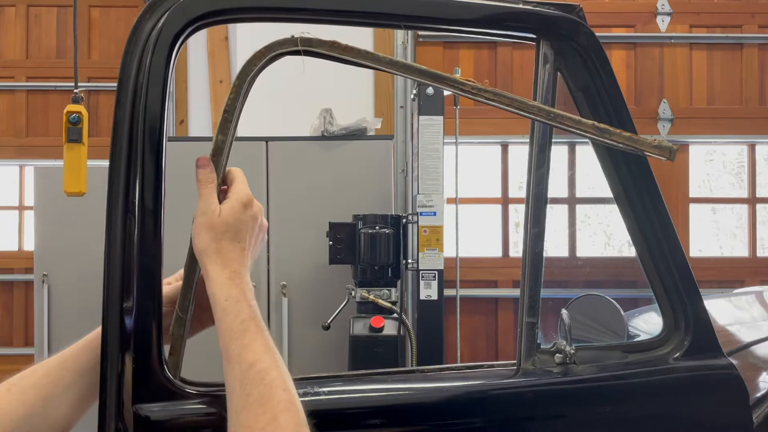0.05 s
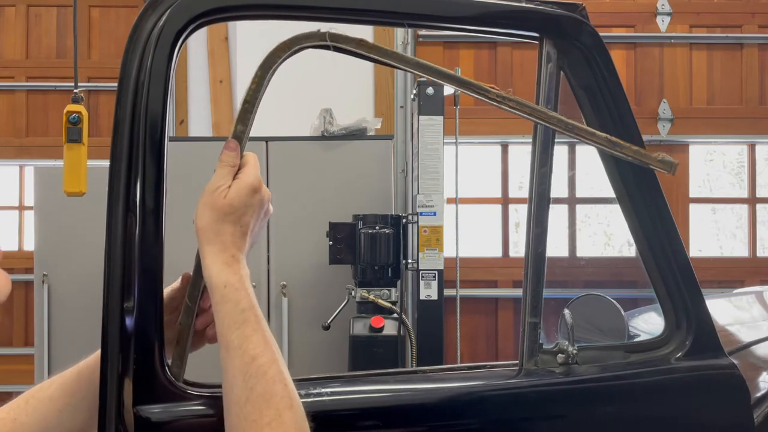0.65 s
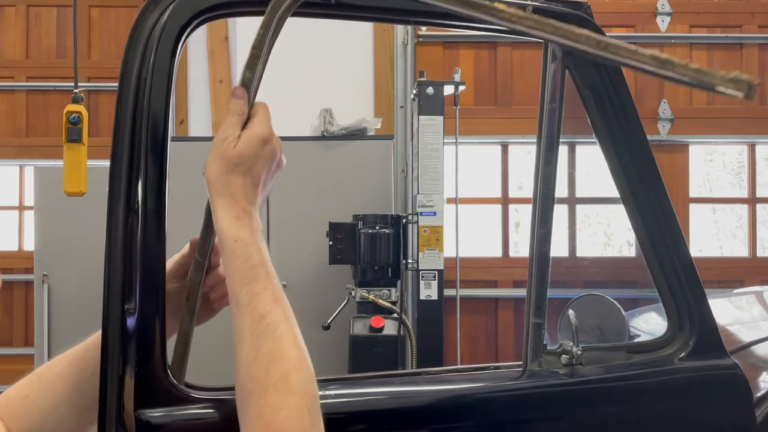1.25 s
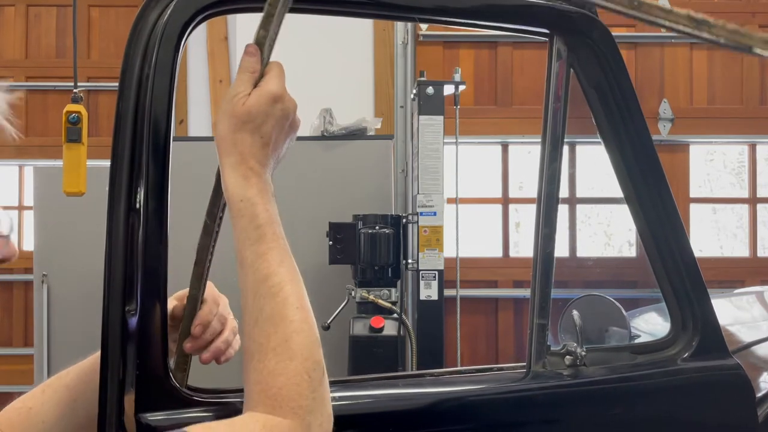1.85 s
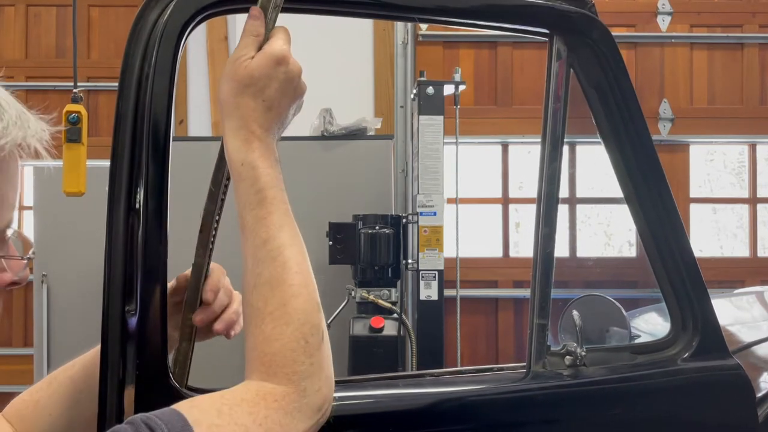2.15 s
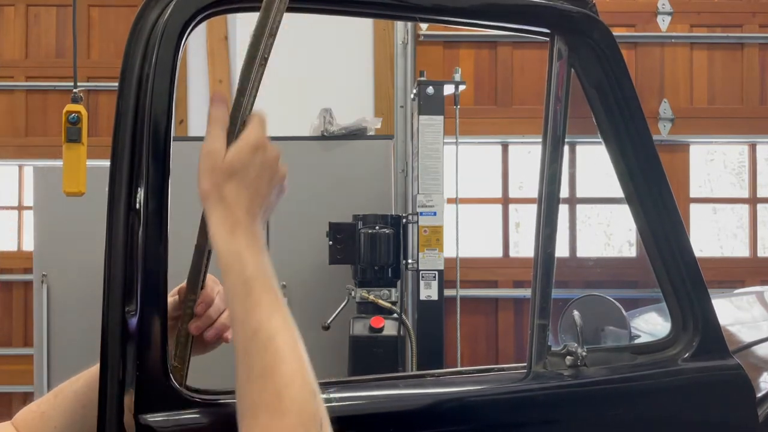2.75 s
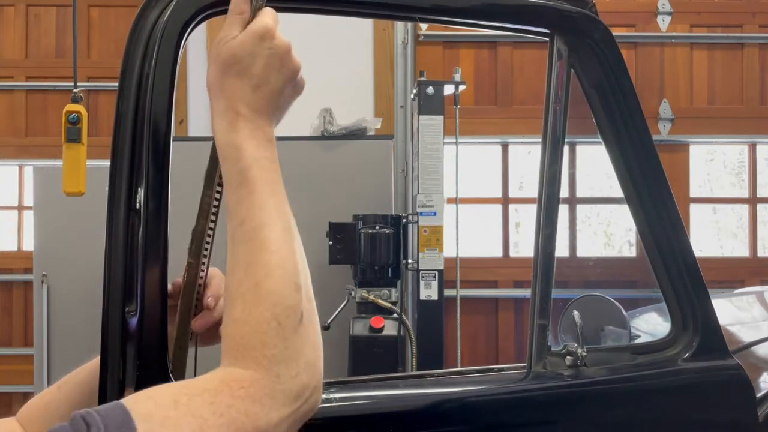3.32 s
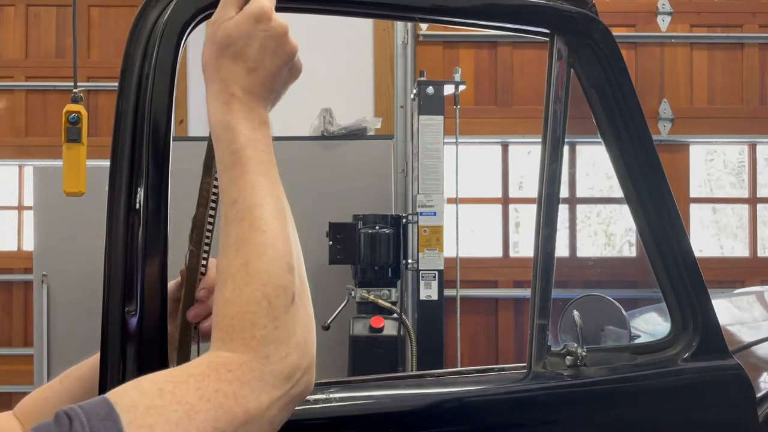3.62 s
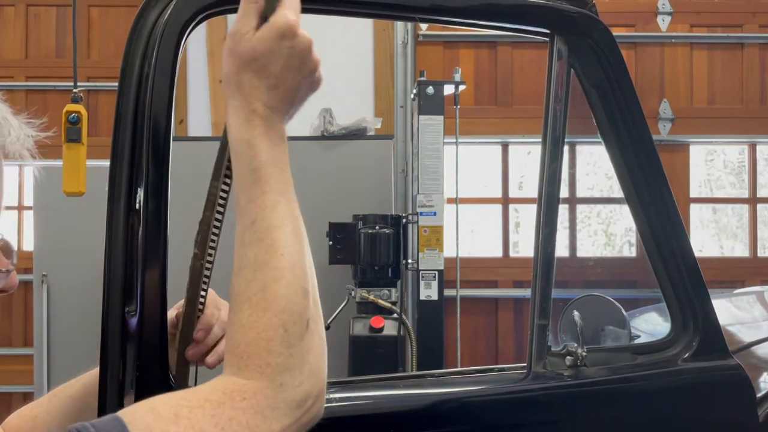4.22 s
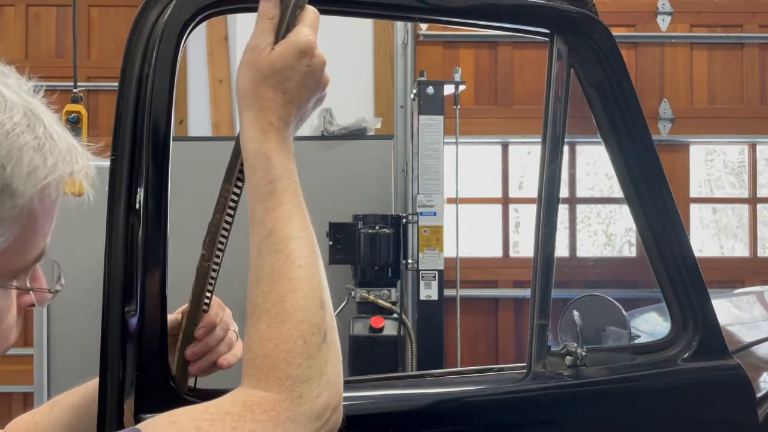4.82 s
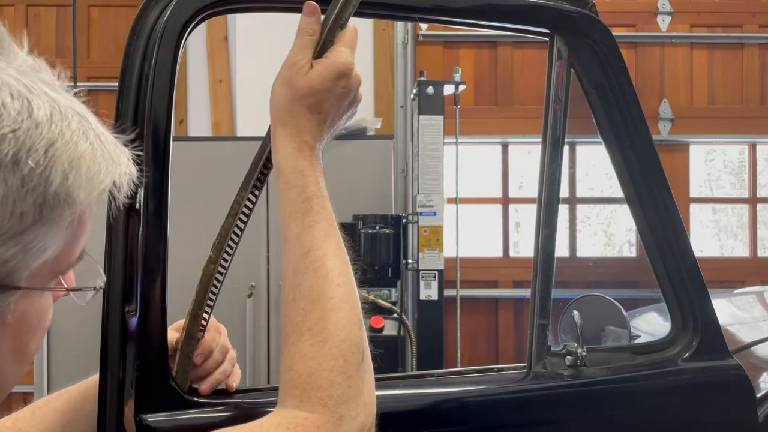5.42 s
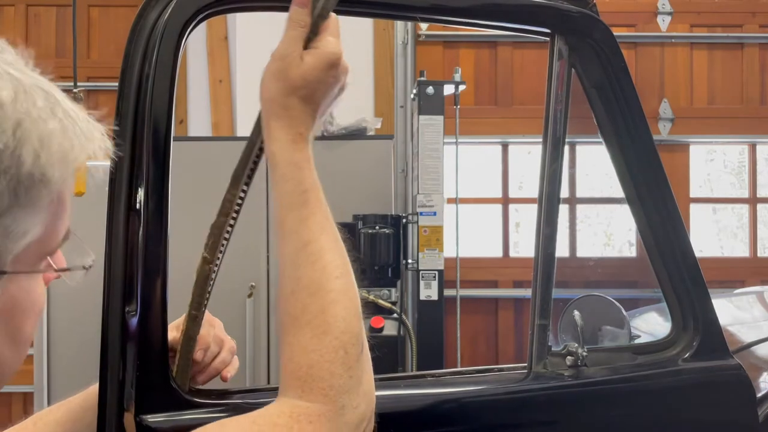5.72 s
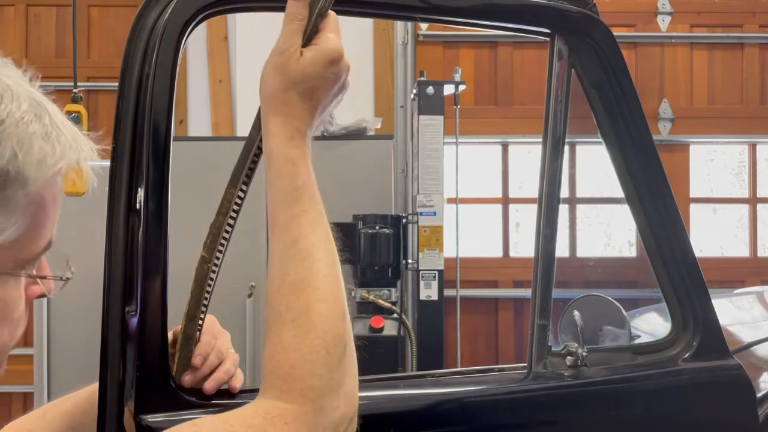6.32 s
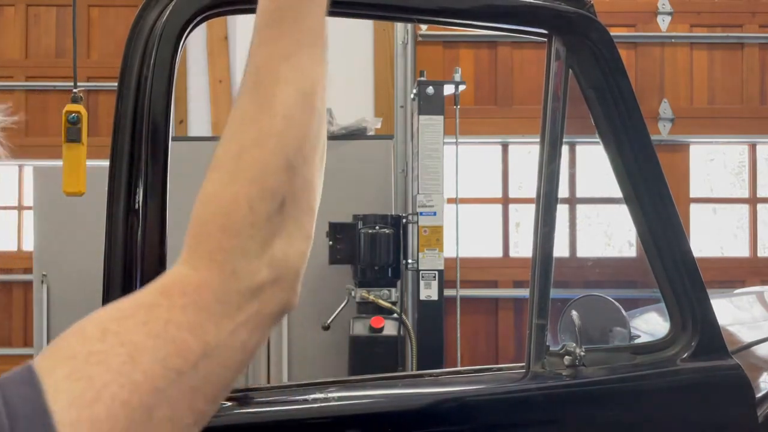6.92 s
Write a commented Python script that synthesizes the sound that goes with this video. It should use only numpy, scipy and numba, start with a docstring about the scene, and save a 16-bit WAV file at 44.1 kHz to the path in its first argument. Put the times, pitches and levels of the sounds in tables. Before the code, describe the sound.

An old glued rubber strip is dragged out of a car door's steel window channel, close to the microphone. Faint rubbing starts the sound, and from about 0.5 to 2.5 seconds short tugs bring low rubber judder, dry scraping and a few soft knocks. Around 3 seconds a hard pull gives a loud, gritty scrape, with snaps and knocks that ring the door panel until 3.5 seconds. Quieter rubbing follows, dotted with ticks of crumbling glue and thin clinks from the strip's metal core. At 5.6 seconds comes a sharper scrape with a knock and a ringing clink. After a lull, another loud rip at 6.5 seconds brings crackling, a sharp snap and several knocks, fading by 7 seconds. The garage adds a short stereo reverberation, with a faint low hum and soft air behind.

```python
"""An old glued-in rubber strip is dragged out of a car door's steel window channel, close to the mic.
The rubber judders, its hard back scrapes and dry glue crumbles; snags let go with ticks and knocks,
all ringing the door panel. The strip's metal core clinks, and a hand brushes along the rubber.
The place is a garage, heard in mid-side stereo: near surfaces answer first, then the whole room,
with a low hum and faint air behind."""
import sys
import numpy as np
from scipy import signal
from scipy.fft import rfft, irfft, next_fast_len
from scipy.io import wavfile
from scipy.ndimage import uniform_filter1d
from numba import njit

SR = 44100
rng = np.random.default_rng(int(sys.argv[2]) if len(sys.argv) > 2 else 0)


def transcribe(signal):
    """Save signal, clipped to [-1, 1], as a 16-bit WAV file at the path in sys.argv[1]."""
    frames = np.atleast_2d(signal).T
    limited = np.clip(frames, -1, 1)
    pcm = np.round(limited * 32767).astype(np.int16)
    wavfile.write(sys.argv[1], SR, pcm)


N = 311346
T = np.arange(N) / SR

# each pull slides the strip a little: (start [s], speeding up [s], steady slide [s],
# slowing time constant [s], rubber judder [dB], scrape [dB], glue grit [dB])
STRIP_PULLS = [(0.22, 0.07, 0.031, 0.042, -58.5, -86, -81), (0.481, 0.14, 0.011, 0.023, -50, -50.5, -54.5),
               (0.68, 0.061, 0.017, 0.065, -55.5, -57.5, -66), (0.85, 0.12, 0.0091, .02, -60, -66, -63.5),
               (0.924, 0.072, 0.027, 0.041, -46, -46, -55), (1.0, 0.074, 0.14, 0.049, -43, -42.5, -50),
               (1.299, 0.22, 0.0068, 0.025, -42.5, -42.5, -49.5),
               (1.52, 0.046, 0.046, 0.026, -45.5, -49, -68.5), (1.74, 0.045, .04, .04, -54, -47.5, -63),
               (1.7, 0.25, 0.13, 0.034, -45, -41.5, -48), (2.285, 0.089, 0.023, 0.054, -42.5, -39.5, -48),
               (2.835, 0.064, 0.019, .03, -58, -47, -46.5), (2.859, 0.13, 0.086, 0.13, -38.5, -31.5, -35.5),
               (3.04, 0.031, 0.039, 0.012, -29, -23, -36), (3.15, 0.027, 0.039, .03, -55, -48, -69),
               (3.294, 0.02, 0.05, 0.049, -41, -30.5, -42.5), (3.579, 0.035, 0.15, 0.13, -53.5, -53, -60.5),
               (4.04, 0.025, 0.57, 0.37, -54, -59, -65.5), (4.7, 0.038, 0.038, 0.03, -51.5, -55, -65),
               (4.897, 0.0074, 0.023, 0.49, -54, -60, -69), (5.371, 0.053, 0.038, 0.035, -47.5, -45, -51),
               (5.605, 0.019, 0.046, 0.065, -47.5, -36, -49.5), (5.8, 0.024, 0.03, 0.06, -47.5, -47.5, -67),
               (6.055, 0.021, 0.25, 0.085, -55, -55, -74), (6.201, 0.041, 0.0043, .009, -64, -62, -54.5),
               (6.452, 0.033, 0.026, 0.019, -36.5, -34.5, -39),
               (6.499, 0.019, 0.064, 0.023, -29, -28, -32.5), (6.6, 0.029, 0.17, 0.15, -61, -41, -35.5),
               (6.962, 0.13, 0.05, 0.037, -67, -52, -68)]
# the strip's rasping edge changes pitch as it bends: (time [s], centre [Hz])
RASP_PITCH = [(0.6, 826), (1.1, 690), (1.6, 1240), (1.84, 1180), (2.08, 820), (2.4, 687), (2.95, 590),
              (3.1, 640), (3.35, 653), (4.2, 1090), (5.6, 1150), (5.72, 660), (6.5, 990), (6.58, 746),
              (6.95, 625)]
# crust and edges snap free: (time [s], level [dB], decay [s], share into steel [dB], piece's pitch [Hz])
CRUST_SNAPS = [(0.949, -53, 0.01, -8, 7500), (1.205, -42.5, 0.015, -22, 7140),
               (3.048, -32.5, 0.026, 3.5, 4130), (3.108, -36.5, 0.0059, 4, 4500),
               (3.302, -41.5, 0.022, 9.5, 3000), (3.401, -40, 0.0047, -3, 7180),
               (3.498, -42, 0.0077, 9.5, 6540), (3.699, -51.5, 0.0056, -9.5, 6580),
               (3.763, -51, 0.0044, -5, 6140), (3.803, -54, 0.014, -1.5, 5230),
               (3.848, -50.5, 0.0043, 6.5, 5400), (4.02, -57.5, .01, 1.5, 4200),
               (4.15, -48.5, 0.014, 0.5, 5500), (4.246, -52.5, 0.011, 9.5, 3220),
               (4.322, -38, 0.008, 2.5, 4000), (4.338, -46.5, .008, -1.5, 4000),
               (4.512, -54, 0.0052, 11.5, 2400), (4.587, -60, 0.0066, 2.5, 3860),
               (4.766, -53.5, .004, 1, 2600), (4.9, -66, 0.01, 9, 2800), (4.926, -51, 0.004, -2, 6500),
               (5.033, -55, 0.0029, -6, 7400), (5.135, -47.5, 0.007, -11, 4830),
               (5.402, -45, 0.01, 7.5, 2320), (5.456, -43, 0.0025, 10, 6200),
               (5.607, -36.5, 0.0042, 2.5, 6800), (5.624, -35, 0.0035, 10, 3000),
               (5.698, -29.5, 0.0037, -16, 6860), (6.065, -60.5, 0.0038, 9.5, 6500),
               (6.323, -63.5, .008, 13.5, 3800), (6.478, -38, 0.024, 1.5, 12000),
               (6.596, -30, 0.0063, -13, 11900), (6.712, -22, .012, -13, 3970),
               (6.78, -29.5, 0.0049, 7, 4700)]
# the strip lurches against the frame: (time [s], level [dB], centre [Hz], decay [s])
FRAME_KNOCKS = [(1.075, -38, 507, 0.047), (1.18, -41, 202, 0.018), (1.226, -35, 222, 0.013),
                (1.29, -38.5, 113, 0.048), (1.98, -44, 109, 0.13), (2.351, -48, 338, 0.0089),
                (2.553, -42, 630, 0.006), (2.998, -26, 258, 0.019), (3.005, -36, 102, .05),
                (3.074, -16, 496, 0.022), (3.086, -23, 347, 0.0092), (3.094, -24, 670, 0.012),
                (3.303, -27.5, 930, 0.014), (3.347, -23, 686, 0.008), (3.4, -33.5, 287, 0.01),
                (4.167, -41.5, 1040, 0.02), (4.324, -42.5, 322, 0.05), (4.519, -44, 1010, 0.01),
                (4.587, -46.5, 860, 0.023), (5.605, -28, 1106, 0.057), (5.674, -29, 328, 0.023),
                (5.69, -37.5, 176, 0.025), (5.726, -35, 172, 0.016), (5.849, -44.5, 410, 0.016),
                (6.321, -45.5, 670, 0.047), (6.495, -24.5, 1330, 0.058), (6.547, -24, 219, 0.024),
                (6.658, -27, 204, 0.0097), (6.721, -29.5, 545, 0.02), (6.794, -23.5, 676, 0.023),
                (6.846, -29.5, 730, 0.023), (6.895, -32.5, 725, 0.033)]
# the door panel's modes: (frequency [Hz], t60 [s], level over the direct sound [dB])
DOOR_MODES = [(109, 0.52, 6.5), (168.4, 0.56, 8), (275.9, 0.54, 0), (331, 0.36, -2), (460.1, 0.16, 9),
              (464.5, 0.54, 2.5), (589, 0.37, -9), (664.5, 0.076, -2.5), (726, 0.18, 2.5), (784, 0.28, -3),
              (1153, 0.35, -8), (1270, 0.49, -14), (1447, 0.079, -0.5), (1493, 0.081, -3.5),
              (1623, 0.06, -5), (1740, .26, -1), (1920, 0.086, -5), (2440, 0.066, -2.5), (5000, 0.19, 1)]
# the strip's metal core touches the channel: (time [s], level [dB], centre [Hz])
CORE_CLINKS = [(4.245, -50.5, 2920), (4.326, -43, 3970), (4.511, -58, 2350), (5.136, -60, 5000),
               (5.41, -50, 2400), (5.622, -32, 1840)]
# the core's modes: (frequency [Hz], t60 [s], level [dB])
CORE_MODES = [(1100, 0.24, -5), (1750, 0.49, -2.5), (2380, .45, -10), (2400, 0.58, -7.5), (2580, 0.41, -9),
              (2790, .35, -4.5), (2950, 0.26, -4.5), (3600, 0.23, -8), (3930, 0.27, -4.5), (4102, 0.11, -1),
              (4500, 0.23, -7), (5220, .22, -5)]
# a hand shifts its grip: (time [s], level [dB], decay [s])
HAND_BRUSHES = [(0, -60, 0.084), (2.737, -76, 0.092)]
# tone colour of each contact and of the garage's air: (frequency [Hz], relative level [dB])
JUDDER_COLOUR = [(40, -28.5), (80, 3), (120, -2), (190, 2), (280, 1), (380, -5), (600, -37)]
SCRAPE_COLOUR = [(200, -15.5), (400, -6), (650, -2), (950, -6), (1400, -8.5), (1900, -15.5), (3000, -25),
                 (6000, -57)]
GRIT_COLOUR = [(900, -3), (2200, 7.5), (3500, 4.5), (5500, -1), (7500, -6), (10000, 1.5), (13000, 2.5),
               (16000, -7.5)]
SNAP_COLOUR = [(60, -24), (250, 8.5), (700, 8), (2000, -18), (4200, 6.5), (6000, -2), (7500, 0), (10000, 4),
               (13000, 6), (16000, -6)]
STEEL_COLOUR = [(120, -50), (250, 0), (700, -2), (1300, 2.5), (2000, -2.5), (3000, -0.5), (6000, -28)]
BRUSH_COLOUR = [(500, -8), (1500, -1.5), (3000, -11), (4200, -3.5), (5050, 2), (5700, -6), (6500, -8.5),
                (8000, -19), (12000, -11), (16000, -37)]
AIR_COLOUR = [(28, -40), (48, -5.5), (75, -9), (115, -13), (236, -21.5), (545, -26), (1000, -46),
              (3000, -50), (8000, -54), (13000, -41.5), (16000, -57)]
# the garage's ring: (frequency [Hz], t60 [s])
GARAGE_DECAY = [(150, 0.98), (600, 0.75), (2000, 0.97), (5000, 0.76), (10000, 0.22), (16000, 0.25)]
# the background hum sinks near the end: (time [s], level [dB])
HUM_LEVEL = [(0, -49.5), (3.2, -48.5), (5.85, -50.5), (6.05, -59)]
# stereo image at the mic: (frequency [Hz], middle [dB], side [dB], left minus right [dB])
MIC_IMAGE = [(60, -2, -14.5, 0), (219, 4.5, -8, -2), (368, 2, -4.5, -0.5), (693, 1, 3.5, 0.5),
             (1970, -2.5, -2, 2.5), (7160, 4.5, 5, 2.5), (7980, -7, 16.5, 2.5), (8550, -29, 4, -9),
             (10040, -5, 5, 1), (11900, -4, -4.5, -1), (13400, -0.5, -32, -0.5)]


def dragging(rasp_db=-9, rasp_width=0.3, rasp_wander=0.15, grains_per_s=13000, dense_grit_db=-50):
    """The strip catches and slides; each catch modulates judder, scrape, rasp and grit together."""
    judder_db, scrape_db, grit_db = contact_levels()
    catch_db = 1.77 * walk(rate=150)
    judder = colour(slips(rate=700, spread_db=1), JUDDER_COLOUR) * undb(judder_db + catch_db - 5.5)
    scrape = colour(slips(rate=3600, spread_db=3.5), SCRAPE_COLOUR) * undb(scrape_db + catch_db - 6.5)
    centre_hz = np.interp(T, *np.transpose(RASP_PITCH)) * np.exp(rasp_wander * walk(rate=28))
    rasp = sweep(slips(rate=2200, spread_db=2), centre_hz, rasp_width)
    rasp = sweep(rasp, centre_hz, 2 * rasp_width)
    rasp = unit(rasp / np.sqrt(centre_hz)) * undb(scrape_db + catch_db + rasp_db)
    # the glue breaks in separate grains under a light pull, densely under a hard one
    grit_rate = grains_per_s * np.clip(undb(grit_db - dense_grit_db), 0.04, 1)
    grit = colour(slips(rate=grit_rate, spread_db=1), GRIT_COLOUR)
    grit *= undb(grit_db + catch_db + walk(rate=220) - 3.5)
    return judder + scrape + rasp + grit


def contact_levels(speed_powers=(0.53, 0.71, 0.99)):
    """Judder, scrape and grit in dB: each goes as a power of speed; rubber judders even at a crawl."""
    energy = np.full((3, N), 1e-14)
    for start, rise, hold, slowing, *levels_db in STRIP_PULLS:
        near = slice(int(start * SR), int((start + rise + hold + 10 * slowing) * SR))
        speed = sliding(start, rise, hold, slowing)[near]
        for k, power in enumerate(speed_powers):
            energy[k, near] += (undb(levels_db[k]) * speed ** power) ** 2
    return 10 * np.log10(energy)


def sliding(start, rise, hold, slowing):
    """Speed of one pull, 0 to 1: the strip gathers speed, slides on and binds again."""
    age = T - start
    gathering = np.sin(np.pi / 2 * np.clip(age / rise, 0, 1)) ** 2
    binding = np.exp(-np.clip((age - rise - hold) / slowing, 0, 100))
    return gathering * binding


def snapping(steel_lag_s=0.009, piece_db=-7, piece_width=0.38, size=11025):
    """Each snap is a short run of fractures that rings the breaking piece and jolts the steel."""
    snaps = CRUST_SNAPS + crumbs()
    crack = sum(undb(db) * burst(start, decay) for start, db, decay, _, _ in snaps)
    crack *= slips(rate=12000, spread_db=10.5)
    pieces = np.zeros(N)
    fractures = slips(rate=5400, spread_db=4.5)
    for start, db, decay, _, hz in snaps:
        near = slice(int(start * SR), int(start * SR) + size)
        width_hz = hz * piece_width
        ring = resonate((burst(start, decay) * fractures)[near], hz, width_hz)
        pieces[near] += undb(db + piece_db) * ring * np.sqrt(SR / (np.pi * width_hz))
    jolt = sum(undb(db + steel_db) * burst(start, decay) for start, db, decay, steel_db, _ in snaps)
    lag = np.exp(-1 / (steel_lag_s * SR))  # the steel takes a moment to respond
    steel = signal.lfilter([1 - lag], [1, -lag], jolt) * slips(rate=12000, spread_db=0)
    return undb(1.06) * colour(crack, SNAP_COLOUR) + pieces + undb(3) * colour(steel, STEEL_COLOUR)


def crumbs(count=18, from_s=3.6, to_s=5.15, decay_s=0.003, steel_db=-10, centre_hz=4270):
    """Crumbs of glue tick off by chance as the strip works loose: extra rows of faint snaps."""
    spacing = (to_s - from_s) / count
    rows = []
    for k, (when, size, pitch) in enumerate(rng.random((count, 3))):
        start = from_s + (k + when) * spacing
        db = -62 + 8.5 * (2 * size - 1)
        rows.append((start, db, decay_s, steel_db, centre_hz * 2 ** (2 * pitch - 1)))
    return rows


def knocking(width=0.46, first_blow=7, blow_cycles=0.73, low_cut_hz=60, size=11025):
    """The strip hits the frame: a firm blow, then chattering rebounds; a stiffer contact is higher."""
    out = np.zeros(N + SR)
    for start, db, hz, decay in FRAME_KNOCKS:
        cycles = T[:size] * hz
        first = cycles * np.exp(-cycles / blow_cycles) * np.cos(2 * np.pi * cycles)
        chatter = unit(resonate(rng.standard_normal(size), hz, hz * width))
        # the rebounds are of like strength, as the hand's pull limits them
        rebounds = unit(resonate(np.tanh(2 * chatter), hz, hz * width))
        fading = np.exp(-T[:size] / decay)
        blow = first_blow * first + rebounds * fading
        out[int(start * SR):][:size] += undb(db - 4) * unit(blow) * np.sqrt(np.mean(fading ** 2))
    # the door radiates little deep bass
    return signal.sosfilt(signal.butter(2, low_cut_hz, "high", fs=SR, output="sos"), out[:N])


def door(force, coupling_power=0.15, firm_db=-30, wander_db=2):
    """The contact reaches the mic directly and via the panel; a firmer press drives the steel more."""
    pressure = np.sqrt(np.abs(uniform_filter1d(force ** 2, SR // 20))) / undb(firm_db)
    drive = force * np.minimum(pressure, 1) ** coupling_power
    ring = 0
    for hz, t60, db in DOOR_MODES:
        # the sliding contact passes the nodes and bellies of each mode
        reach = undb(db + wander_db * walk(rate=3.87))
        ring += resonate(drive * reach, hz, width_hz=np.log(1000) / (np.pi * t60))
    return force + ring


def clinking(db_per_octave=14):
    """The metal core rings thinly on the channel; the hardness of the touch picks the loudest modes."""
    out = np.zeros(N + SR)
    for start, db, centre_hz in CORE_CLINKS:
        for hz, t60, mode_db in CORE_MODES:
            octaves = abs(np.log2(hz / centre_hz))
            out[int(start * SR):][:SR] += undb(db + mode_db - db_per_octave * octaves) * ringing(hz, t60)
    return out[:N]


def ringing(hz, t60):
    """One second of a fading mode, made rough as the loose metal rattles against its seat."""
    rattle = (1 + walk(rate=320)[:SR]) / np.sqrt(2)
    return rattle * np.cos(2 * np.pi * hz * T[:SR]) * np.exp(-np.log(1000) * T[:SR] / t60)


def brushing(rise_s=0.00096):
    """Skin slides on the strip: a soft, high hiss that fades as the hand comes to rest."""
    level = sum(undb(db) * burst(start, decay) * np.clip((T - start) / rise_s, 0, 1)
                for start, db, decay in HAND_BRUSHES)
    return colour(rng.standard_normal(N), BRUSH_COLOUR) * level


def garage(sound, early_s, early_db, first_s, steps=24):
    """The contact travels along the channel, so the reflections reaching the mic keep changing."""
    out = np.zeros(N + 2 * SR)
    hop = N // steps + 1
    for k in range(steps + 1):
        start, stop = max(0, (k - 1) * hop), min(N, (k + 1) * hop)
        crossfade = np.cos(np.pi / 2 * (np.arange(start, stop) / hop - k))
        wet = signal.fftconvolve(sound[start:stop] * crossfade, reflections(early_s, early_db, first_s))
        out[start:start + len(wet)] += wet
    return out[:N]


def reflections(early_s, early_db, first_s, size=32768):
    """Close surfaces answer first, then the whole garage; even in colour, but treble dies soonest."""
    hz, t, cells = signal.stft(rng.standard_normal(size), SR, nperseg=512)
    fading = np.exp(-np.log(1000) * t / along(GARAGE_DECAY, hz)[:, None])
    tail = signal.istft(cells * fading, SR)[1][:size]
    early_lift = 1 + undb(early_db) * np.exp(-T[:size] / early_s)
    spectrum = rfft(tail * (T[:size] >= first_s) * early_lift)
    flattened = irfft(spectrum / np.sqrt(uniform_filter1d(np.abs(spectrum) ** 2, size=200)))
    return flattened / np.linalg.norm(flattened)


def room_tone(hum_hz=65.4, air_db=-63.5):
    """The garage at rest, as middle and side: a wavering low hum in the centre, faint air all round."""
    waver = unit(resonate(rng.standard_normal(N), hum_hz, width_hz=11))
    hum = unit(np.sin(2 * np.pi * hum_hz * T) + 0.19 * waver)
    hum *= undb(np.interp(T, *np.transpose(HUM_LEVEL)))
    middle, side = (colour(rng.standard_normal(N), AIR_COLOUR) * undb(air_db + walk(rate=1))
                    for _ in range(2))
    return middle + hum, side


def slips(rate, spread_db):
    """Tiny random slips, rate a second, varying in size; the power does not depend on the rate."""
    happens = rng.random(N) < rate / SR
    size = undb(spread_db * np.clip(rng.standard_normal(N), -2, 2))
    return unit(happens * size * rng.choice([-1, 1], N) / np.sqrt(rate))


def burst(start, decay):
    """Force that sets in at once and dies away."""
    first = int(start * SR)
    age = T[:min(SR // 2, N - first)]
    return np.pad(np.exp(-age / decay), (first, N - first - len(age)))


def walk(rate):
    """Random drift with an rms of one, turning about rate times a second."""
    return unit(np.interp(T * rate, np.arange(4000), rng.standard_normal(4000)))


def resonate(x, hz, width_hz):
    """One resonance, gain one at its centre."""
    return signal.lfilter(*signal.iirpeak(hz, hz / width_hz, fs=SR), x)


@njit
def sweep(x, hz, width):
    """A resonance whose centre moves; its width is a share of the centre."""
    out = np.empty(len(x))
    band_state, low_state = 0., 0.
    for i in range(len(x)):
        tuning = np.tan(np.pi * hz[i] / SR)
        band = (band_state + tuning * (x[i] - low_state)) / (1 + tuning * (tuning + width))
        band_state = 2 * band - band_state
        low_state += 2 * tuning * band
        out[i] = width * band
    return out


def colour(x, points, size=4096):
    """Filter shaped by (frequency [Hz], level [dB]) points; it keeps the power of white noise."""
    gain = undb(along(points, np.fft.rfftfreq(size, 1 / SR)))
    cepstrum = irfft(np.log(gain))
    cepstrum[1:size // 2] *= 2  # folding the cepstrum makes the filter causal
    cepstrum[size // 2 + 1:] = 0
    response = irfft(np.exp(rfft(cepstrum)))
    return signal.fftconvolve(x, response / np.linalg.norm(response))[:len(x)]


def along(points, hz, column=1):
    """Read a table on a log-frequency axis."""
    points = np.array(points, float)
    return np.interp(np.log(hz + 1), np.log(points[:, 0]), points[:, column])


def undb(db):
    """Decibels to gain."""
    return 10 ** (np.asarray(db) / 20)


def unit(x):
    """Scale to an rms of one."""
    return x / np.sqrt(np.mean(x ** 2))


def scene():
    """Strip and door close in front, the garage all round; middle and side decode to left and right."""
    close = door(dragging() + snapping() + knocking()) + clinking() + brushing()
    middle, side = room_tone()
    middle += undb(-1.5) * close
    middle += undb(-3) * garage(close, early_s=0.0077, early_db=13, first_s=0.00098)
    side += undb(-3.5) * garage(close, early_s=0.0054, early_db=15, first_s=0)
    size = next_fast_len(N + SR)
    hz = np.fft.rfftfreq(size, 1 / SR)
    middle_db, side_db, pan_db = (along(MIC_IMAGE, hz, column=k) for k in range(1, 4))
    sign = np.array([[1], [-1]])  # left, right
    stereo = rfft(middle, size) * undb(middle_db) + sign * rfft(side, size) * undb(side_db)
    return irfft(stereo * undb(sign * pan_db / 2), size)[:, :N]


def record(dry):
    """The recorder cuts the top treble steeply."""
    top_hz = 15950
    return signal.sosfilt(signal.ellip(8, 0.2, 70, top_hz, fs=SR, output="sos"), dry)


dry = scene()
out = record(dry)
transcribe(out)
```